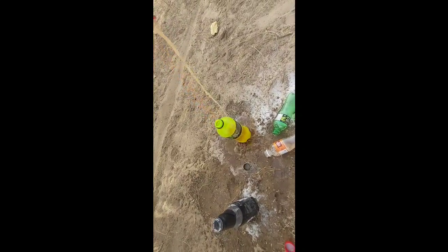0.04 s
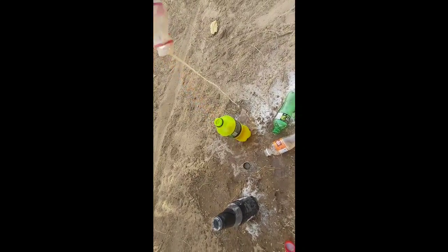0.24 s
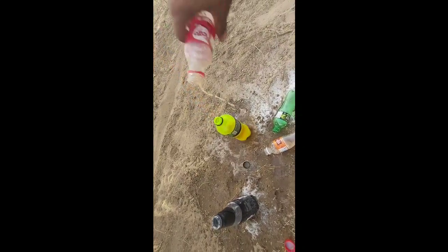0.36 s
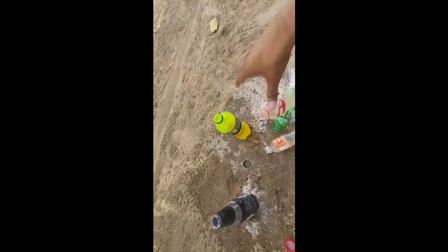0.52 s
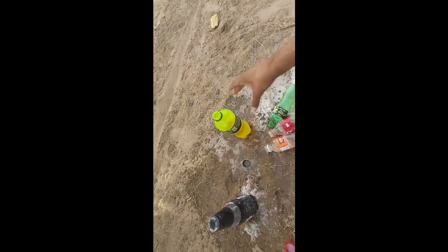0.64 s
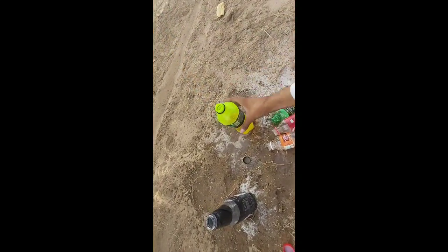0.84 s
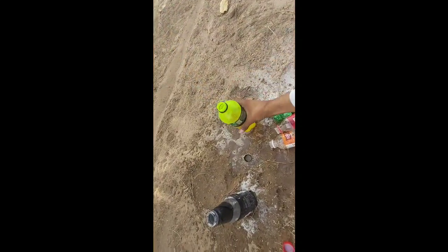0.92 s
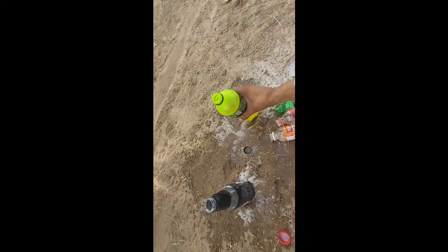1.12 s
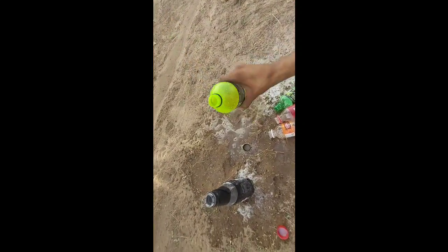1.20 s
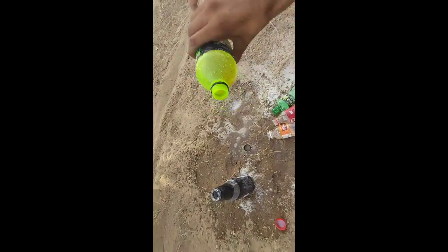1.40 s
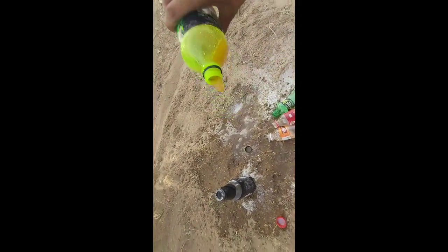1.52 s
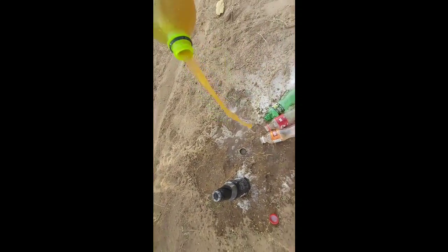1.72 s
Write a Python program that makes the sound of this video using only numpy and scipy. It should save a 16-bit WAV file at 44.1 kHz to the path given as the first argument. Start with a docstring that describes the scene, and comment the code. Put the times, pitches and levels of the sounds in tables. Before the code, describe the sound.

An empty plastic bottle drops with a hollow double knock after a brief trickle.

```python
"""Outdoors on sandy ground, a thin stream of drink spatters, rings in tiny bubbles and runs out.
The emptied plastic bottle is dropped, bounces against another and settles: the impacts excite the
modes of the walls and the resonance of the air inside. A hand then scrapes a bottle off the sand.
Light wind buffets the microphone over a faint outdoor background."""
import sys
import numpy as np
from scipy import signal
from scipy.fft import rfft, irfft, next_fast_len
from scipy.io import wavfile

SR = 44100
rng = np.random.default_rng(int(sys.argv[2]) if len(sys.argv) > 2 else 0)


def unload_wav(signal):
    """Save mono or channel-first audio to the path in sys.argv[1] as 16-bit WAV at rate SR, clipped to [-1, 1]."""
    wavfile.write(
        sys.argv[1],
        SR,
        np.round(np.clip(np.atleast_2d(signal).T, -1, 1) * 32767).astype(np.int16),
    )


N = 77175
T = np.arange(N) / SR


def undb(db):
    """Amplitude grows tenfold for every 20 dB."""
    return 10 ** (np.asarray(db) / 20)


def curve(rows):
    """An amplitude envelope joins (seconds, dB) points by straight lines in decibels."""
    return undb(np.interp(T, *np.array(rows).T))


def pan(db):
    """A level difference, left minus right, places a sound to one side."""
    return undb(np.array([[db], [-db]]) / 2)


def fade(start, t60):
    """Exponential decay: after a sudden onset the level falls 60 dB in t60 seconds."""
    return (T >= start) * np.exp(-np.log(1000) * np.maximum(T - start, 0) / t60)


def noise(correlation=0):
    """A common and an opposed part add to two partly correlated channels of white noise."""
    mid, side = rng.standard_normal((2, N))
    opposed = np.array([side, -side])
    return (np.sqrt(1 + correlation) * mid + np.sqrt(1 - correlation) * opposed) / np.sqrt(2)


def grains(rough, correlation=0):
    """Log-normal amplitude modulation breaks noise into grains 20 samples long."""
    size = np.exp(rough * np.repeat(rng.standard_normal(N // 20 + 1), 20)[:N] - rough ** 2)
    return noise(correlation) * size


def colour(x, points):
    """A minimum-phase filter through (Hz, dB) points shapes white noise and conserves its power."""
    hz, db = np.array(points).T
    n = 2 * next_fast_len(N)
    gain = undb(np.interp(np.log(np.arange(n // 2 + 1) * SR / n + 1), np.log(hz), db))
    cepstrum = irfft(np.log(gain / np.sqrt(np.mean(gain ** 2))))
    cepstrum[1:n // 2] *= 2  # folding makes the filter causal
    cepstrum[n // 2 + 1:] = 0
    return irfft(rfft(x, n) * np.exp(rfft(cepstrum)))[..., :N]


def wind():
    """Turbulent pressure on the microphone rumbles, mostly on the left, in gusts and single buffets."""
    # Each row: time in seconds, relative level in dB.
    gust_levels = [(0.0, -43), (0.096, -50), (0.214, -44), (0.326, -51), (0.38, -37.5), (0.438, -45.5),
                   (0.588, -44), (0.692, -47), (0.764, -45.5), (0.944, -54), (0.994, -45.5), (1.174, -54),
                   (1.256, -45.5), (1.412, -74), (1.506, -47), (1.602, -45.5), (1.636, -42.5), (1.75, -56)]
    # Each row: frequency in Hz, relative level in dB.
    spectrum = [(20, -17.5), (45, -7), (72, -1.5), (110, -8), (170, -17.5), (250, -26), (500, -42.5),
                (1500, -73.5)]
    # Each row: centre in seconds, frequency in Hz, level in dB, left minus right in dB.
    buffets = [(0.223, 63, -40.5, 28), (0.38, 55.7, -31.5, 5), (0.475, 108, -44, 25),
               (0.548, 92, -41, 23.5), (.6, 151, -37.5, 11), (0.83, 78.4, -44, 22), (0.997, 79.5, -41, 8),
               (1.645, 73.7, -36.5, -1)]
    buffet_width_s = 0.011
    out = colour(noise(), spectrum) * curve(gust_levels) * undb(-5.5) * pan(21)
    for s, hz, db, side in buffets:
        envelope = np.exp(-((T - s) / buffet_width_s) ** 2 / 2)
        out += undb(db) * pan(side) * envelope * np.cos(2 * np.pi * hz * (T - s))
    return out


def open_air():
    """Moving air flutters as low noise with random amplitude modulation, over a steady background."""
    # Each row: time in seconds, mean level in dB.
    flutter_levels = [(0, -67.5), (.22, -50), (.32, -54.5), (.5, -51.5), (.8, -54.5), (.93, -66),
                      (1.05, -61.5), (1.36, -71.5), (1.53, -65), (1.75, -73.5)]
    # Each row of both spectra: frequency in Hz, relative level in dB.
    flutter_spectrum = [(100, -23), (220, -6), (380, 2), (550, -9.5), (900, -23), (2000, -23.5),
                        (8000, -54.5)]
    background_spectrum = [(100, 10), (400, -4), (900, -1.5), (2200, 3), (4000, -8.5), (6000, -15),
                           (9000, -27), (12000, -16.5), (16000, -11.5)]
    puffs_per_s = 35
    flutter = colour(noise(correlation=0.11), flutter_spectrum) * curve(flutter_levels)
    puff_db = 3.6 * np.interp(T * puffs_per_s, np.arange(N), rng.standard_normal(N))
    background = colour(noise(correlation=0.065), background_spectrum) * undb(-70)
    return flutter * undb(puff_db) + background


def bubble(s, hz, t60):
    """Air trapped in liquid is a damped oscillator; its pitch rises as it rings."""
    glide_per_s = 8.1  # as a share of the starting pitch
    live = (T >= s) & (T < s + 2 * t60)
    age = T[live] - s
    lag_s = np.array([[0], [rng.standard_normal() * .00005]])  # between the channels
    envelope = np.clip(age * hz / 2, 0, 1) * np.exp(-np.log(1000) * age / t60)
    out = np.zeros((2, N))
    out[:, live] = envelope * np.sin(2 * np.pi * hz * (age + lag_s + glide_per_s * age ** 2 / 2))
    return out


def stream():
    """Many small impacts on the ground merge into a fizz, in which fine drops ring as bubbles."""
    # Each row: time in seconds, level in dB.
    levels = [(0, -52), (.07, -55), (.14, -61.5), (.24, -56), (.33, -64), (.42, -72), (.55, -66.5),
              (.8, -64.5), (.92, -79), (1.75, -80.5)]
    # Each row: frequency in Hz, relative level in dB.
    spectrum = [(400, 2), (1500, -5), (2300, 0), (3300, 3), (5500, -4), (7500, 2), (9000, -8), (12000, 2.5),
                (16000, -11.5)]
    drop_count, centre_hz, t60_cycles, stream_ends_s = 70, 5800, 30.5, .36
    fizz = colour(grains(rough=0.49), spectrum)
    for when, pitch, size in rng.standard_normal((drop_count, 3)):
        hz = centre_hz * 2 ** np.tanh(pitch)
        above_fizz_db = 7.5 + 2.9 * size
        fizz += undb(above_fizz_db) * bubble(stream_ends_s * (when % 1), hz, t60_cycles / hz)
    return fizz * curve(levels)


def large_drops():
    """Air entrainment: each larger drop traps a ringing bubble and throws a burst of spray."""
    # Each row: start in seconds, frequency in Hz, level in dB, T60 in seconds.
    drops = [(0.029, 3930, -41, 0.016), (0.061, 4250, -42, 0.01), (0.075, 4400, -41.5, 0.014),
             (.080, 426, -40, 0.047), (.083, 584, -39, 0.025), (.1775, 4100, -40.5, 0.012),
             (.181, 3270, -39.5, 0.012), (0.193, 3310, -32, 0.016), (0.1935, 3940, -30.5, 0.018),
             (0.1958, 8030, -30.5, 0.0087), (0.201, 3050, -40, 0.011), (0.2471, 2850, -43, 0.013)]
    spray_db = -7
    out = 0
    for s, hz, db, t60 in drops:
        spray = colour(noise(), [(hz / 3, -36), (hz / 2, -20), (hz, 0), (hz * 2, -22)])
        out += undb(db) * (bubble(s, hz, t60) + undb(spray_db) * fade(s, t60) * spray)
    return out


def ticks():
    """Brief impacts of spatter and grit radiate broadband ticks."""
    # Each row: start in seconds, level in dB.
    impacts = [(0.0621, -37), (0.2586, -41.5), (0.495, -53), (0.834, -59), (1.655, -57), (1.678, -59.5)]
    # Each row: frequency in Hz, relative level in dB.
    spectrum = [(500, -8), (2000, -20), (4000, -1), (7000, -4.5), (12000, -4), (16000, -8.5)]
    envelope = sum(undb(db) * fade(s, t60=0.025) for s, db in impacts)
    return colour(noise() * envelope, spectrum)


def ring(blows, modes):
    """Modal superposition: each blow excites damped modes, which run sharp until the dent relaxes."""
    sharp_share, relax_s, contact_s = 0.054, .007, 0.00058
    warped_time = T + sharp_share * relax_s * (1 - np.exp(-T / relax_s))
    response = 0
    for k, (hz, db, t60) in enumerate(modes):
        polarity = (-1) ** k  # neighbouring modes swing in opposite directions
        response += polarity * undb(db) * fade(0, t60) * np.sin(2 * np.pi * hz * warped_time)
    impulses = np.zeros(N)
    for s, db in blows:
        impulses[int(s * SR)] += undb(db)
    return signal.fftconvolve(impulses, response * (1 - np.exp(-T / contact_s)))[:N]


def hand_bumps():
    """Soft contact with the hand excites only low, heavily damped modes of a bottle."""
    # Each row: start in seconds, level in dB.
    grips = [(.385, -49), (.452, -41.5), (1.441, -52), (1.478, -53)]
    # Each row: frequency in Hz, relative level in dB, T60 in seconds.
    modes = [(401, 2, 0.024), (532, -5.5, 0.029), (720, -12, 0.028)]
    return ring(grips, modes)


def bottle_knocks():
    """Impacts set the dropped bottle's wall, its stiff neck and the other bottle in free vibration."""
    # Each row of these three: start in seconds, level in dB.
    wall_blows = [(.5770, -23.5), (0.6919, -45)]
    neck_blows = [(.6278, -32.5), (.6375, -43), (.6485, -44.5), (.6532, -41), (.6790, -48), (.7720, -54)]
    neighbour_blows = [(.6340, -25.5), (.6470, -34), (.723, -53)]
    # Each row of these three: frequency in Hz, relative level in dB, T60 in seconds.
    wall_modes = [(379, -7.5, 0.098), (418.4, -3.5, 0.085), (598, -4.5, 0.049), (732, -7.5, 0.053),
                  (779, -11, 0.052), (859, -6.5, 0.068), (1161, -10, 0.13), (1295, -4, 0.023),
                  (1423, -6, 0.031), (1480, -8, 0.021), (2120, -22, 0.06), (2367, -24.5, 0.17),
                  (2786, -13, 0.055)]
    neck_modes = [(1540, 0.5, 0.019), (1828, -5, 0.031), (2040, -4, 0.025), (2240, -8.5, 0.037)]
    neighbour_modes = [(337.8, -5, 0.14), (479, -8, 0.15), (527.7, -1, 0.094), (620, -5, 0.051),
                       (782, -5, 0.04), (1124, -0.5, 0.033), (1341, -1.5, 0.03), (1420, -3.5, 0.031)]
    dropped = ring(wall_blows, wall_modes) + ring(neck_blows, neck_modes)
    return dropped + ring(neighbour_blows, neighbour_modes)


def crackle():
    """Thin plastic crackles at each contact, a broadband transient that decays quickly."""
    # Each row: start in seconds, level in dB.
    contacts = [(0.576, -24), (.5800, -27.5), (0.584, -39), (0.6276, -33), (0.6316, -31), (.6348, -25.5),
                (0.6479, -30.5), (.653, -41.5), (.7030, -43.5), (0.726, -46), (0.774, -52.5)]
    # Each row: frequency in Hz, relative level in dB.
    spectrum = [(200, 14.5), (900, -3.5), (1400, 10), (1900, 3), (3000, 2.5), (4500, 2.5), (6000, 0),
                (9000, -2), (12500, -1), (15500, -10)]
    envelope = sum(undb(db) * fade(s, t60=0.021) for s, db in contacts)
    return colour(envelope * grains(rough=0.38, correlation=-.05), spectrum)


def hollow_note():
    """Cavity resonance: the air in the bottle sounds on a square landing until the next touch damps it."""
    # Each row: start in seconds, frequency in Hz, level in dB, time until damping in seconds.
    notes = [(0.5777, 293.5, -19.5, 0.053), (0.6901, 286, -27, 0.0057)]
    rise_s, free_t60_s, damping_t60_s = 0.0061, 0.35, 0.13
    out = 0
    for s, hz, db, held in notes:
        age = np.maximum(T - s, 0)
        envelope = (1 - np.exp(-age / rise_s)) * fade(s, free_t60_s)
        damping = undb(-60 * np.maximum(age - held, 0) / damping_t60_s)
        out += undb(db) * envelope * damping * np.sin(2 * np.pi * hz * age)
    return out


def sand_scrape():
    """Friction noise swells as a bottle slides faster; once it lifts, sand trickles off it."""
    # Each row: frequency in Hz, relative level in dB.
    spectrum = [(500, -27), (2500, -6.5), (5300, -3), (7500, -13), (9000, -28), (12000, -17), (16000, -27)]
    lift_s, swell_s = .985, 0.038
    width = np.where(T < lift_s, swell_s, swell_s / 2)
    slide = undb(-61) * np.exp(-((T - lift_s) / width) ** 2 / 2)
    trickle = undb(-66) * fade(lift_s, t60=0.36)
    return np.hypot(slide, trickle) * colour(grains(rough=0.48), spectrum)  # their powers add


def echo(x):
    """Scattering from the surroundings returns a weak, short, diffuse tail."""
    # Each row: frequency in Hz, relative level in dB.
    spectrum = [(100, -26.5), (350, 7), (700, -12), (1500, -3), (4000, -6.5), (8000, -4), (15000, -4.5)]
    tail = colour(noise(correlation=0.14) * fade(start=0.0043, t60=0.28), spectrum)
    tail /= np.sqrt(np.sum(tail ** 2) / 2)
    return undb(-12) * signal.fftconvolve(x, tail, axes=1)[:, :N]


def scene():
    """Superposition: the near sounds and their echo add to the dry hollow note and the outdoor air."""
    bottle_pan = pan(1.6)
    near = bottle_knocks() * bottle_pan + crackle()
    near += stream() + large_drops() + ticks()
    near += hand_bumps() + sand_scrape()
    return near + echo(near) + hollow_note() * bottle_pan + wind() + open_air()


def record(dry):
    """Band limiting: a steep elliptic low-pass filter removes the highest treble."""
    cutoff_hz = 15400
    return signal.sosfilt(signal.ellip(8, .2, 70, cutoff_hz, fs=SR, output="sos"), dry)


dry = scene()
out = record(dry)
unload_wav(out)
```